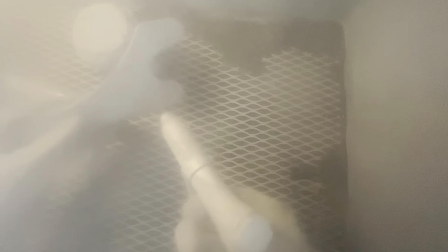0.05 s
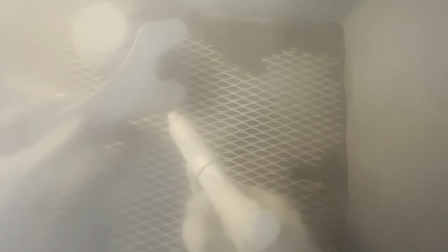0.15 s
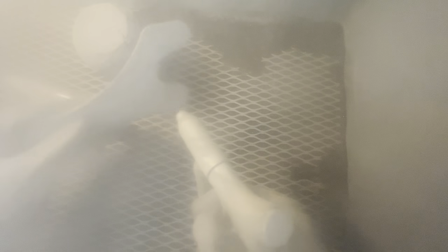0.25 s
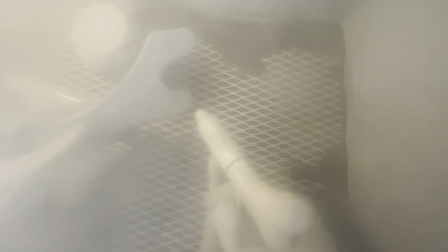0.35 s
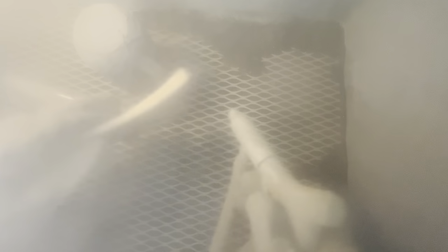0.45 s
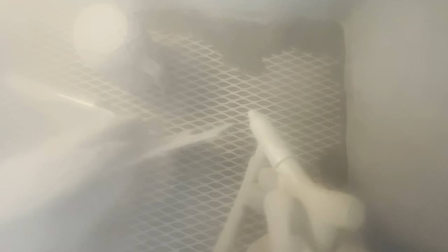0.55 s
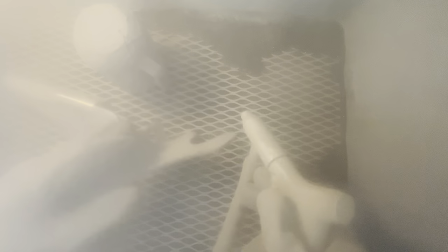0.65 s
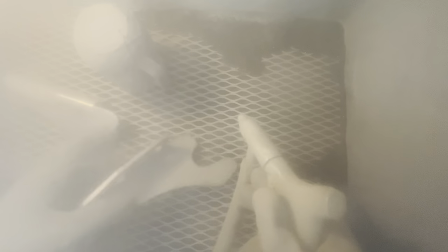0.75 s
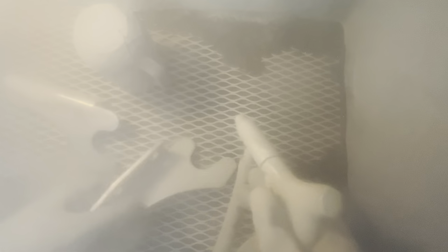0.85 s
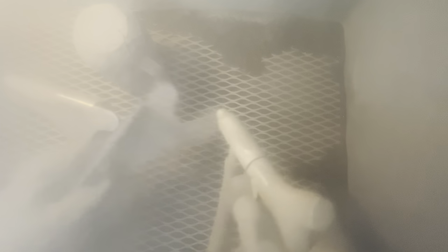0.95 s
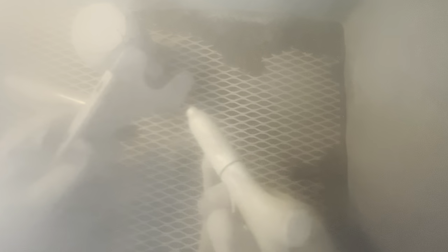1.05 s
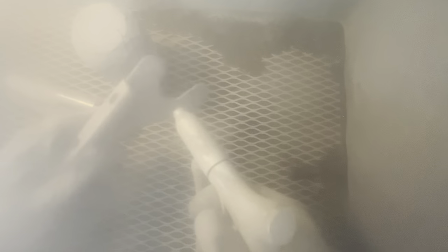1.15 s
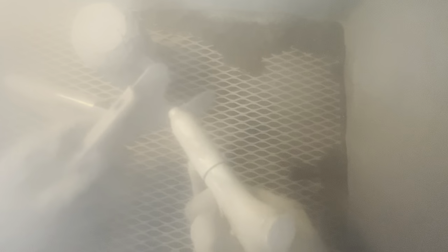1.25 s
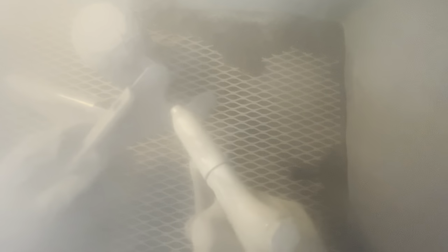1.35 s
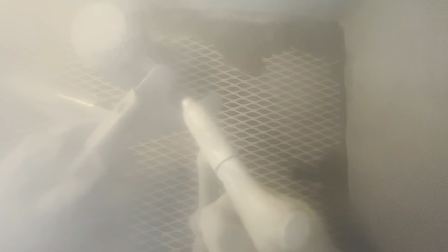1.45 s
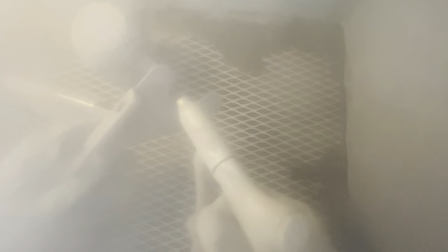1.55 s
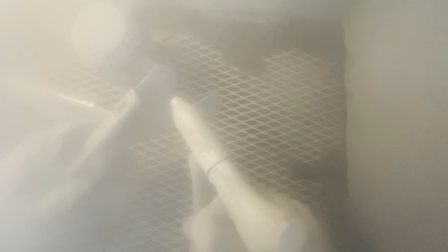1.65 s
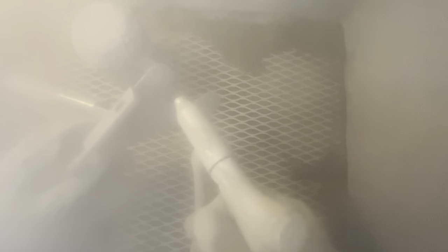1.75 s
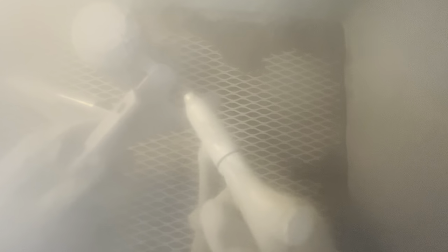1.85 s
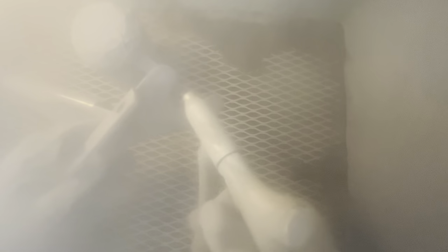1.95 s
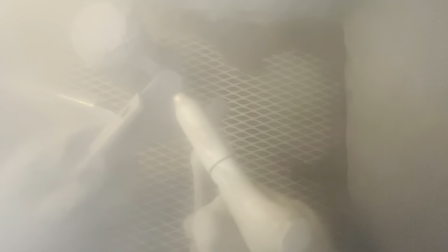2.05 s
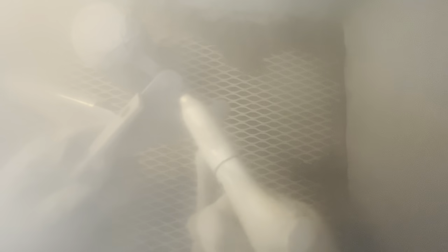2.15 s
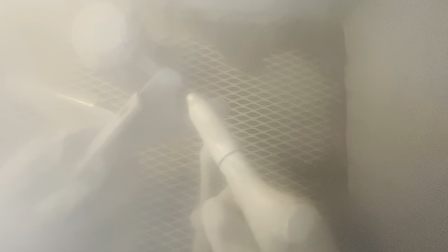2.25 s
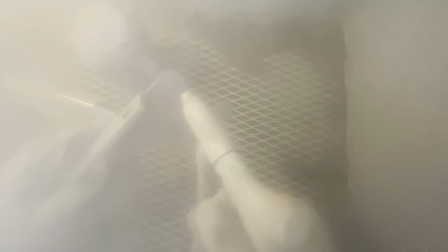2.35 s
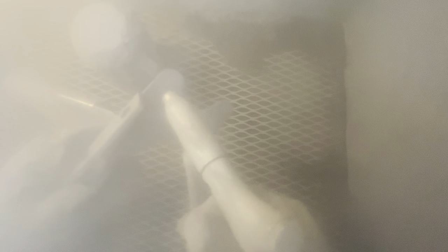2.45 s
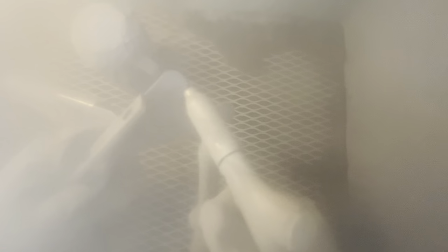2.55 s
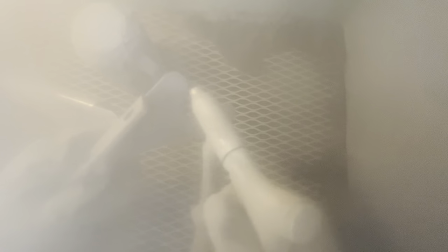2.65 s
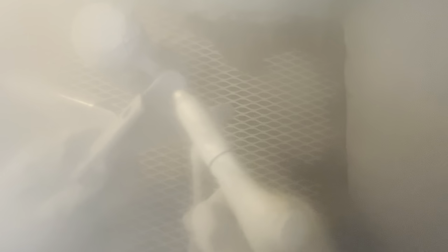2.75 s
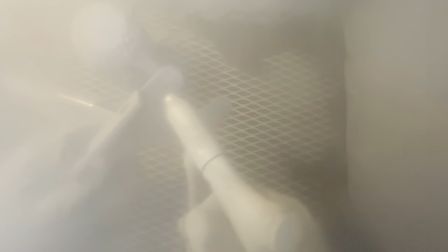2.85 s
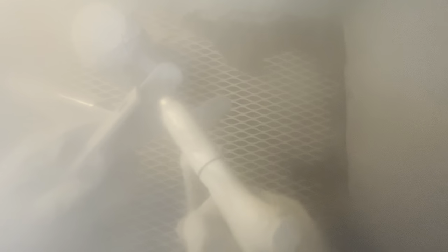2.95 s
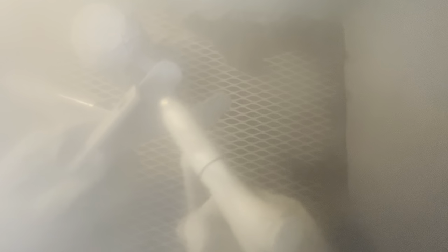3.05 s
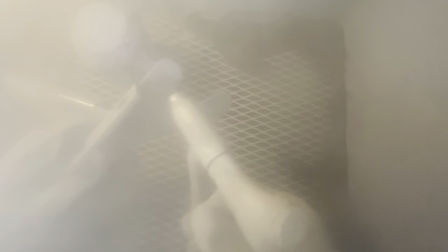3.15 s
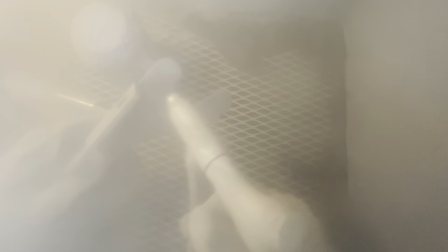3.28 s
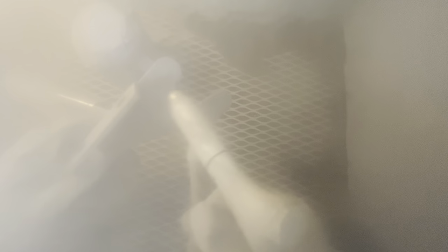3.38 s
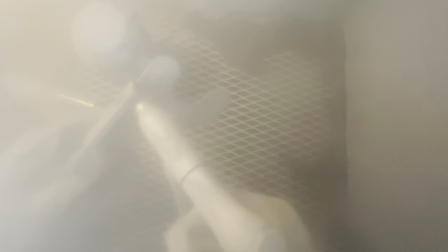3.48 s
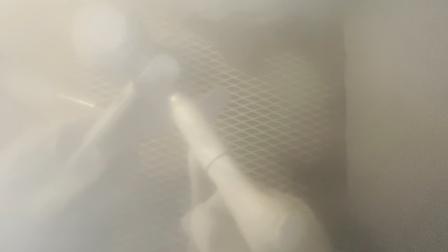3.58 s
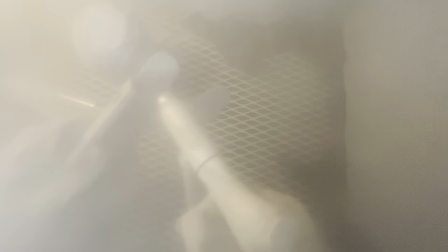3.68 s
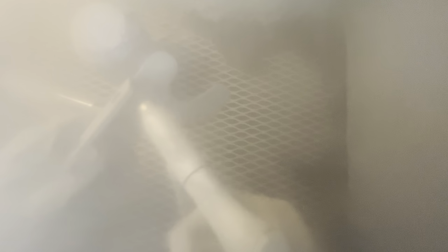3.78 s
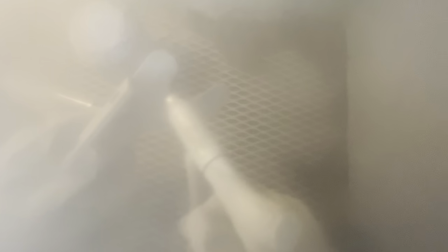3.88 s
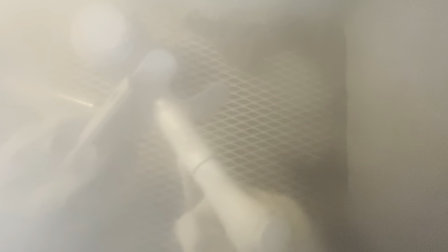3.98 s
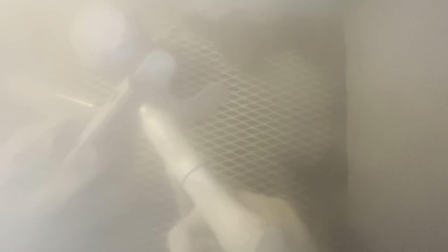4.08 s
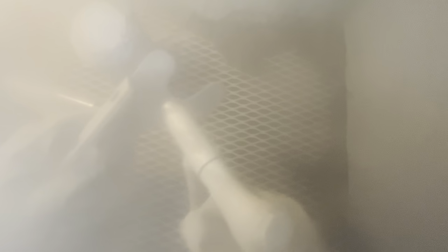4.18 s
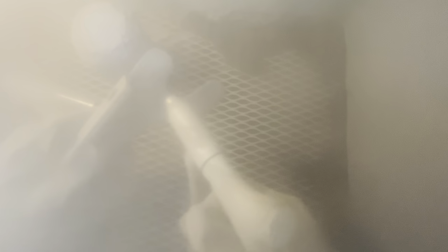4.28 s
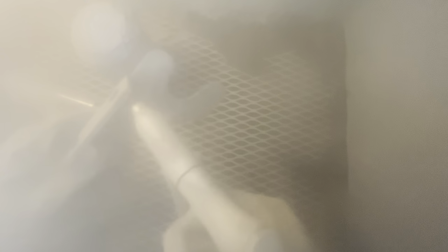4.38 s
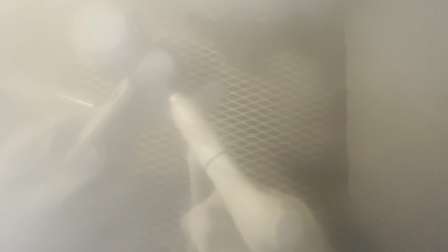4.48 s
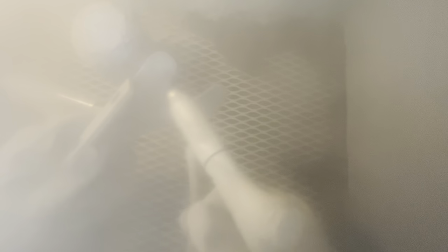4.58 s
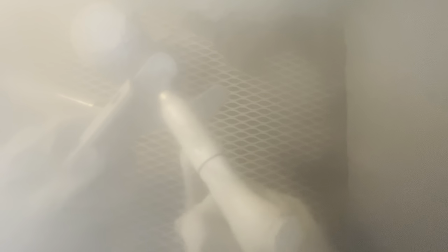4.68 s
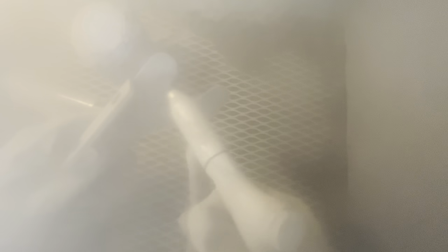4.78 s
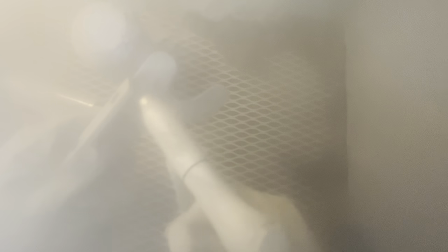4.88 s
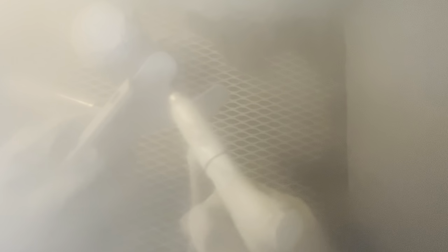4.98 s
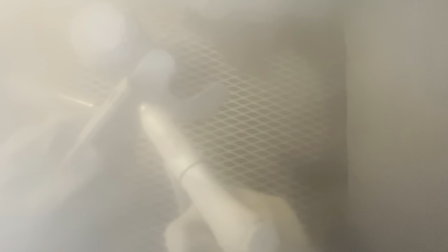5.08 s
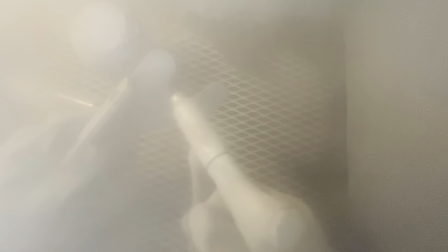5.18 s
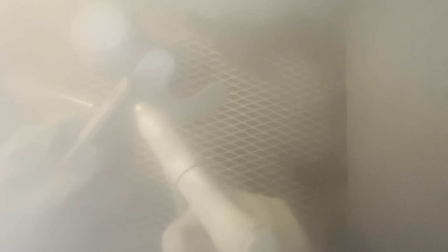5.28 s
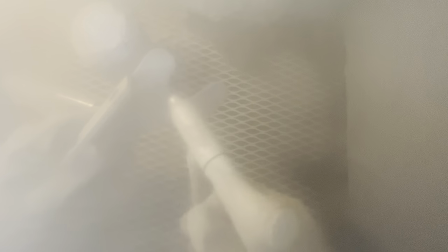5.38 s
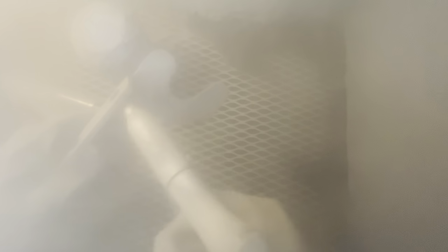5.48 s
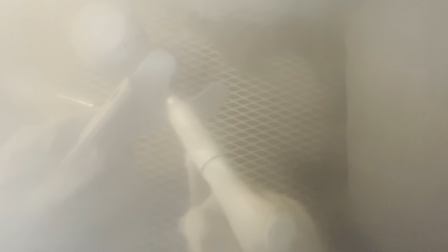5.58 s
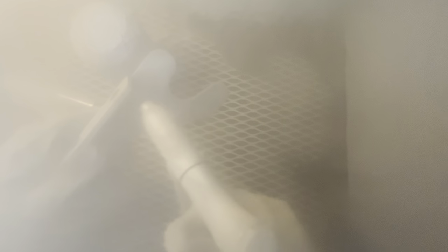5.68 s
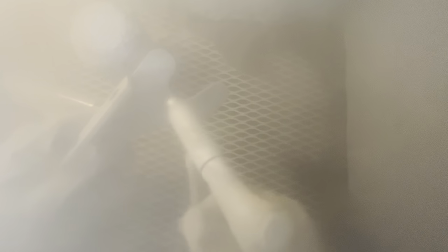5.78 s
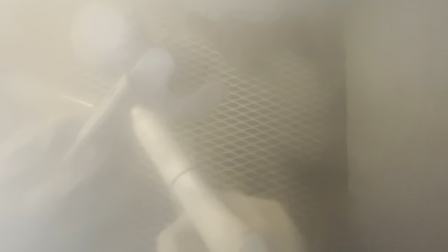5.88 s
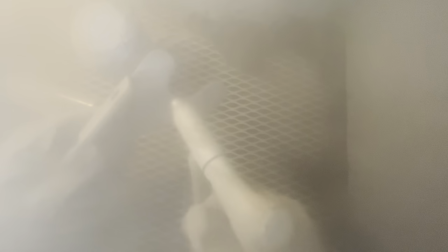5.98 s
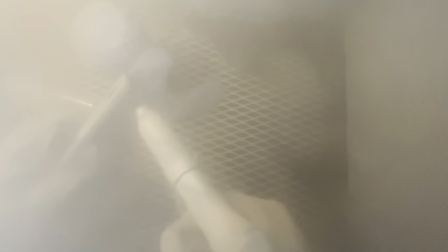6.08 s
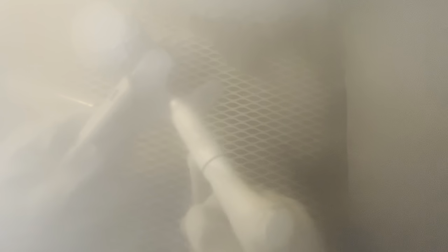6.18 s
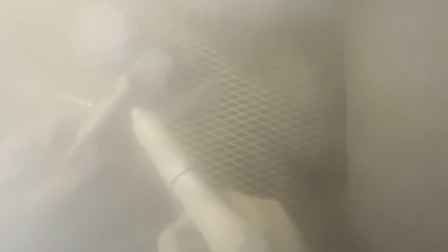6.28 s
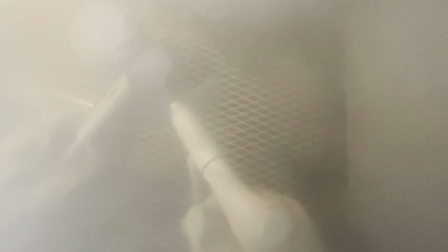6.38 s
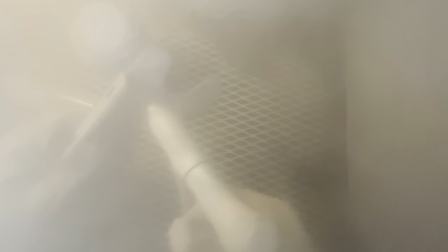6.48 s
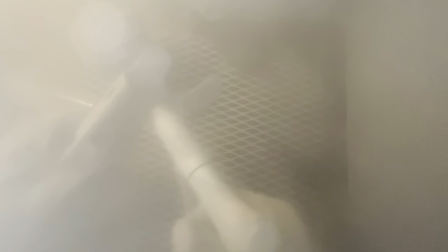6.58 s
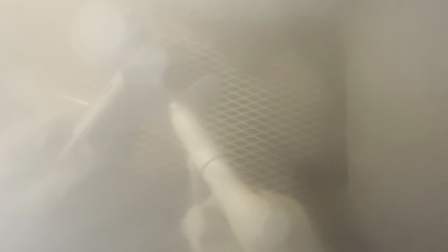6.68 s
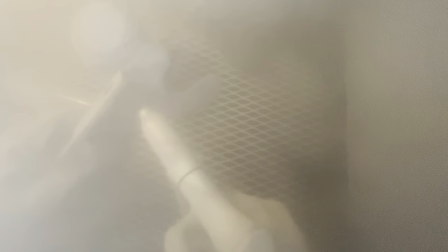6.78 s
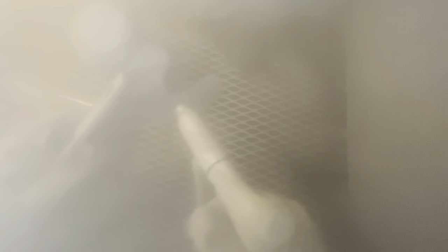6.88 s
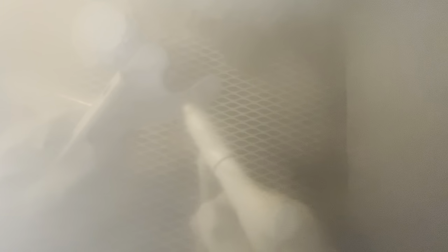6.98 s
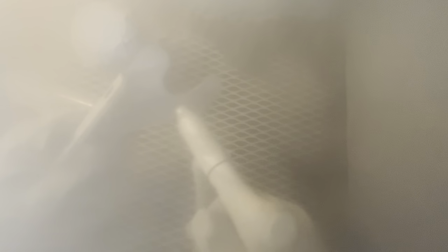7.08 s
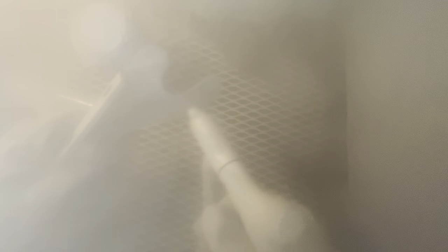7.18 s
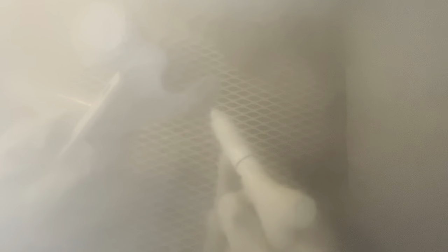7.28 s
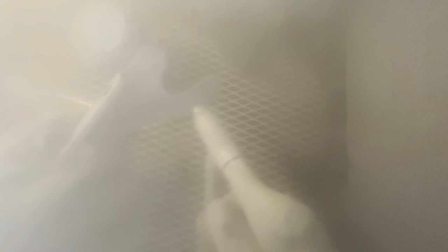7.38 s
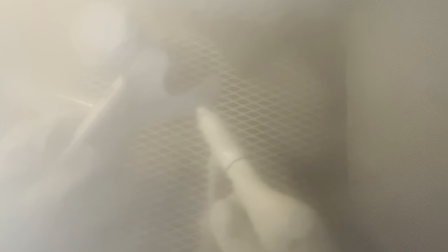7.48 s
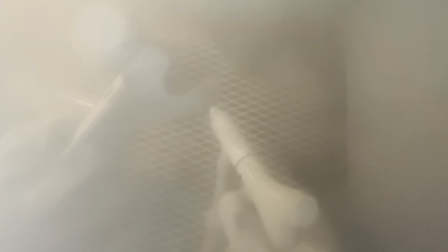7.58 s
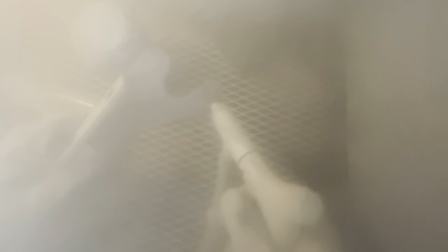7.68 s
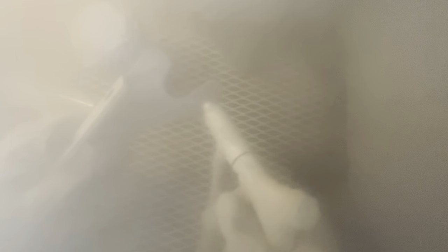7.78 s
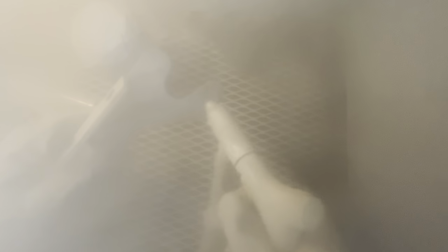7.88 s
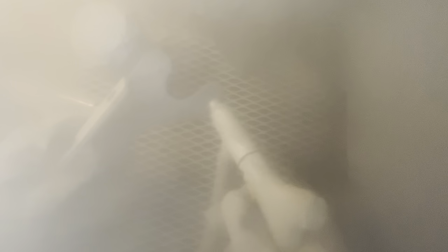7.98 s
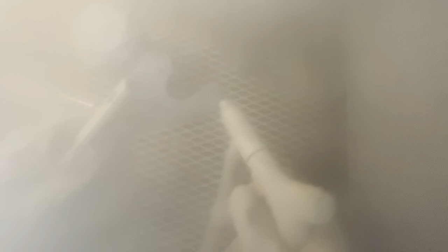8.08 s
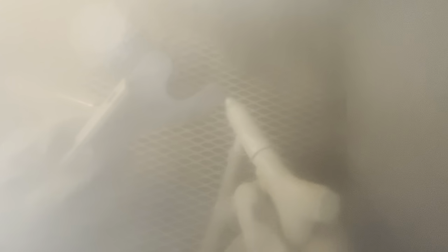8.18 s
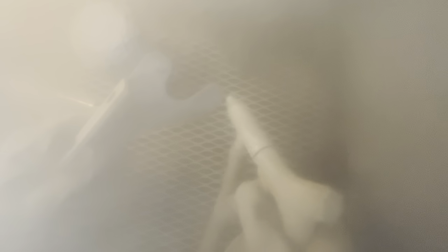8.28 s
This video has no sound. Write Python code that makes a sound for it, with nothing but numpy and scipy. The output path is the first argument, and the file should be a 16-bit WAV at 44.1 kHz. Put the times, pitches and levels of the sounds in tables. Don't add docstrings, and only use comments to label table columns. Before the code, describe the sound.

Low fan air and motor drone, a momentary silence, then fan alone with sharp metal clacks and a small scrape. At just over a second, compressed air and abrasive erupt in a dense bright hiss, with light sheet-metal drumming. It wavers quickly, dips when the jet misses the part, changes ringing colour twice and gradually softens. Close, boxy stereo pickup, short metallic reflections, left side louder.

```python
import sys
import numpy as np
from scipy import signal
from scipy.fft import rfft, irfft
from scipy.io import wavfile
from scipy.ndimage import uniform_filter1d

SR = 44100
rng = np.random.default_rng(int(sys.argv[2]) if len(sys.argv) > 2 else 0)


def rack_gain(trim_db):
    fader = np.asarray(trim_db, float)
    return 10 ** (fader / 20)


def store_wav(level_fs):
    pcm = np.round(np.clip(np.atleast_2d(level_fs), -1, 1) * 32767)
    wavfile.write(sys.argv[1], SR, pcm.T.astype(np.int16))


N = 367794
T = np.arange(N) / SR
HOP = 1536
SIZE = 3 * HOP
HZ = np.arange(SIZE // 2 + 1) * SR / SIZE
STARTS = np.arange(-HOP, N, HOP)
CUT_S, OPEN_S = .5545, 1.268


def walk(rate):
    k = int(SR / rate)
    steps = np.repeat(rng.standard_normal(N // k + 1), k)
    return 0.43 * uniform_filter1d(uniform_filter1d(steps, k), k)[:N]


def drift(shape, keep):
    rows = rng.standard_normal((len(STARTS), *shape))
    keep = min(keep, .995)
    return signal.lfilter([np.sqrt(1 - keep ** 2)], [1, -keep], rows, axis=0, zi=keep * rows[-1:])[0]


def grit(scatter_db):
    weight_db = scatter_db * np.minimum(rng.exponential(size=N), 5)
    x = rng.standard_normal(N) * rack_gain(weight_db)
    return x / x.std()


def moments(x):
    padded = np.pad(x, (HOP, 3 * HOP))
    frames = padded[STARTS[:, None] + HOP + np.arange(2 * HOP)] * np.hanning(2 * HOP)
    return rfft(np.pad(frames, ((0, 0), (HOP // 8, HOP - HOP // 8))))


def box(swing, echo_db):
    t60_s, creep_keep, wave_db = 0.067, 0.98, -3
    alike_hz = 2770
    fall = np.exp(-np.log(1000) * np.arange(HOP * 3 // 4) / SR / t60_s)
    echoes = drift((4, len(fall)), creep_keep) * fall / np.sqrt(np.sum(fall ** 2))
    tails = rfft(echoes, SIZE).transpose(1, 0, 2)
    alike = np.exp(-(HZ / alike_hz) ** 2)
    still = rack_gain(echo_db - 6.2 * alike) * tails[:2]
    rocking = rack_gain(wave_db - 14 * alike) * swing * tails[2:]
    left, own = still + rocking
    return 1 + np.array([left, alike * left + np.sqrt(1 - alike ** 2) * own])


def heard(common, apart, colour, body, alike=1):
    # (pitch [Hz], common share [0-1], lead of the right port [rad])
    ports = [(0, 0.77, -2.5), (298, 0.62, 0), (640, 0.81, 2), (1080, 0.87, 1.2), (1850, 0.93, 1.37),
             (2320, 0.8, 1.5), (4300, 0.73, 1), (5520, 0.9, 1.5), (6200, 0, 6), (8580, 0.54, 7),
             (10400, 0.98, 10), (11540, 0.93, 12), (12700, .8, 12.5), (13400, .95, 16.5), (14300, .9, 17),
             (14800, .7, 17), (15400, .95, 18)]
    hz, *db = np.transpose(colour)
    gain = rack_gain([np.interp(np.log(HZ + 1), np.log(hz), d) for d in db])[:, None] * body
    gain = gain / np.sqrt(np.mean(np.abs(gain) ** 2, axis=(0, 2), keepdims=True) / 2)
    port_hz, share, lead = np.transpose(ports)
    share = np.clip(alike * np.interp(HZ, port_hz, share), 0, 1)
    left = moments(common)
    shifted = np.exp(1j * np.interp(HZ, port_hz, lead)) * left
    right = share * shifted + np.sqrt(1 - share ** 2) * moments(apart)
    frames = irfft(gain * np.array([left, right]), SIZE)
    out = np.zeros((2, N + 5 * HOP))
    for k, start in enumerate(STARTS):
        out[:, start + HOP:start + HOP + SIZE] += frames[:, k]
    return out[:, HOP + HOP // 8:][:, :N]


def extractor(cabinet):
    # (pitch [Hz], left level [dB], right level [dB])
    fan_tone = [(25, -14, -18), (110, 1, -2), (243, -7.5, -15), (650, -3.5, -5.5), (820, 1, -2.5),
                (1150, 1, -2), (1500, -1, -9), (1800, -5, -7.5), (3960, -15.5, -19), (5530, -9.5, -22),
                (7450, -15.5, -23.5), (9400, -23, -20.5), (10700, -25, -25), (12700, -27, -34),
                (15700, -31, -26)]
    # (pitch [Hz], left level [dB], right level [dB])
    motor_tone = [(101, -7, -7), (223, -10.5, -12), (346, 5, 0), (556, -1, -7.5), (770, 0.5, 3.5),
                  (1090, -3, -8), (1550, -3, -7), (1900, -43, -41)]
    fan_db, motor_db = -40.5, -36
    since = np.maximum(T - OPEN_S, 0)
    duck_db = -5.5 * (1 - np.exp(-since / 0.2)) - 9 * (1 - np.exp(-since / 5.2))
    ducked = rack_gain(fan_db + duck_db + .5 * walk(12))
    motor = rack_gain(motor_db + 0.99 * walk(7.5)) * (T < CUT_S)
    fan = heard(ducked * grit(1.0), ducked * grit(.6), fan_tone, cabinet, alike=.45)
    return fan + heard(motor * grit(.7), motor * grit(.7), motor_tone, cabinet)


def knocks():
    # (time [s], rms level [dB], rise [s], t60 [s], pitch [Hz])
    contacts = [(0.57, -42, 0.023, 0.18, 160), (0.7446, -25.5, 0.016, 0.096, 1270),
                (0.744, -45, .006, .05, 4000), (0.745, -27, 0.016, 0.092, 316),
                (.761, -39, .005, 0.075, 330), (.762, -39, .005, .08, 1100),
                (0.772, -37, 0.0036, 0.092, 240), (.80, -42, .01, 0.3, 290),
                (.904, -32.5, 0.015, 0.067, 1240), (0.905, -34, 0.017, 0.095, 300),
                (0.92, -48, .01, 0.3, 110), (1.24, -40.5, .03, 0.23, 430), (4.2, -38, 0.086, 0.4, 1300),
                (4.151, -51, 0.062, 1.0, 360), (0.744, -47, .005, .04, 7400)]
    out = np.zeros((2, N))
    for s, db, rise, t60, hz in contacts:
        span = slice(int((s - .2) * SR), int((s + .6) * SR))
        t = T[span] - s
        shape = np.where(t < 0, np.exp(t / rise * 2), np.exp(-np.log(1000) * t / t60))
        near, far = rng.standard_normal((2, len(t))) * shape
        grate = signal.butter(2, (0.65 * hz, 1.29 * hz), "bandpass", fs=SR, output="sos")
        ring = signal.sosfilt(grate, [1.74 * near, .5 * near + 0.4 * far])
        out[:, span] += rack_gain(db) * np.sqrt(SR / 2 / hz) * ring
    return out


def thumps():
    # (time [s], peak level [dB], pitch [Hz], t60 [s])
    bumps = [
        (.745, -38, 80, 0.17),
        (.739, -26.5, 950, .075),
        (.740, -26.5, 1430, .09),
        (.743, -29, 330, .1),
        (.903, -37, 930, .08),
        (.905, -38, 1400, .08),
        (1.275, -19.5, 109, 0.092),
        (3.29, -45, 74.6, .25),
        (4.202, -46.5, 159.4, 0.56),
        (4.533, -44, 110, 0.26),
    ]
    out = np.zeros(N)
    for s, db, hz, t60 in bumps:
        t = np.maximum(T - s, 0)
        push = 1 - np.exp(-t / 0.0052)
        out += rack_gain(db) * push * np.exp(-np.log(1000) * t / t60) * np.sin(2 * np.pi * hz * t)
    return out * np.array([[1.5], [.9]])


def stroke():
    wave_hz, uneven_rad = 6.3, 1.2
    return np.sin(2 * np.pi * wave_hz * STARTS / SR + uneven_rad * drift((), keep=0.945))[:, None]


def handling():
    # (back on [s], sliding [s], off [s], part ring [dB])
    misses = [
        (1.455, .03, .03, -4.5),
        (1.6, 0.037, 0.027, -4),
        (2.33, .05, .03, -7),
        (2.61, 0.15, 0.036, -6.5),
        (4.02, 0.07, .17, -6),
        (4.16, .04, 0.068, -4),
        (6.09, 0.033, 0.2, -2.5),
        (7.52, 0.064, 0.12, -4.5),
    ]
    # (time [s], walls [dB], part [dB])
    slugs = [(1.49, 2.5, 1.5), (3.35, 1.5, -1.2), (3.64, 1.5, 0), (3.77, 0, 2), (4.25, 0.5, 0.5),
             (4.39, 1.5, -1), (4.9, 0, -2.5), (5.31, 1.5, -1.8), (6.17, 1.5, -1), (6.29, 1.5, -1),
             (6.47, 1, -1.2), (7.6, 0.5, 1.5), (7.92, 0.5, 0)]
    snap_s, slug_s = .04, 0.019
    miss_db = 0
    for s, slide, off, db in misses:
        leaving = (T - s + off + slide) / slide
        returning = (s - T) / snap_s + .5
        miss_db = miss_db + db * np.clip(np.minimum(leaving, returning), 0, 1)
    slug_db = sum(np.outer(db, np.exp(-.5 * ((T - s) / slug_s) ** 2)) for s, *db in slugs)
    return miss_db, *slug_db


def faces(swing, ring_db, wander_db, swing_db, right_share):
    # (pitch [Hz], width [Hz], level [dB])
    face_a = [(1590, 60, -3), (1780, 94, -2), (2040, 65, -3), (2410, 39, -3), (2880, 48, -8),
              (3690, 92, -9), (4810, 79, -2), (5280, 38, -2), (5610, 160, -4), (6260, 150, -2),
              (6550, 31, -4), (7740, 90, -6), (8110, 58, -4), (8580, 180, -5)]
    face_b = [(1770, 110, 0), (2140, 44, -.5), (2420, 38, -5), (2740, 32, -9), (3310, 62, -10),
              (3980, 83, -9), (4800, 53, -3), (4990, 64, -4), (5360, 45, -4), (5640, 170, -2),
              (5970, 36, -5), (6150, 120, -4), (6780, 190, -5), (7360, 65, -3), (8590, 94, -4),
              (7620, 63, -3)]
    face_c = [(1570, 160, -1), (2200, 49, -1), (2480, 44, -5), (3550, 38, -7), (4720, 140, -5),
              (5460, 55, 2.5), (5730, 39, -5), (6120, 57, -2), (6560, 92, -2), (7270, 110, -3),
              (7900, 68, -3), (8750, 110, -4), (9160, 60, -8)]
    # (pitch [Hz], ..)
    hollows = [
        (2550, 3150, 5450, 7470),
        (1930, 2280, 3090, 3440, 4120, 5870),
        (1900, 2750, 3200, 5860, 7600),
    ]
    turn_s, turn_length_s = (2.8, 7.35), 0.3
    hollow_width_hz, hollow_depth, hollow_swing = 140, .7, .29
    first, second = (np.clip(((STARTS + HOP) / SR - s) / turn_length_s + .5, 0, 1) for s in turn_s)
    aims = (1 - first, first - second, second)
    power, hollow = 0, 0
    for face, dips, aim in zip((face_a, face_b, face_c), hollows, aims):
        ring = np.array([rack_gain(db) ** 2 / (1 + (2 * (HZ - hz) / max(width, 45)) ** 2)
                         for hz, width, db in face])
        swell_db = wander_db * drift((len(face),), keep=0.73)
        swell_db = swell_db + swing_db * swing * rng.standard_normal(len(face))
        power = power + (np.clip(aim, 0, 1)[:, None] * rack_gain(ring_db + swell_db) ** 2) @ ring
        left_over = 1
        for hz in dips:
            depth = hollow_depth + hollow_swing * swing * np.cos(hz / 200)
            left_over = left_over * (1 - depth * np.exp(-(2 * (HZ - hz) / hollow_width_hz) ** 2))
        hollow = hollow + aim[:, None] * left_over
    return np.sqrt(hollow * np.array([1 + power, 1 + right_share ** 2 * power]))


def blast(swing):
    # (pitch [Hz], left level [dB], right level [dB])
    sheet_tone = [(20, -32, -36), (60, -21, -27), (116, 1.5, -0.5), (203, 1, -19), (340, 4, 1),
                  (427, 3, -9.5), (670, -7, -7), (876, 2.5, 2), (1410, -20.5, -21)]
    nozzle_tone = [(6000, -27.5, -27), (7700, -3.5, -5), (8680, -5, 4.5), (11000, -7.5, -8),
                   (10770, 0.5, -4.5), (13050, -14, -7), (14600, -15, -21), (14600, -11, -27),
                   (15700, -9, -26), (17000, -44, -46)]
    part_tone = [(620, -29, -33), (916, -27, -23.5), (1375, -8, -12.5), (1710, -5.5, -13.5),
                 (1860, -6, -21), (2150, -5, -15.5), (2690, -12, -18), (3920, -21.5, -31), (4970, -36, -39)]
    walls_tone = [(1800, -45, -42), (2780, -10.5, -20), (3370, -10.5, -13), (4400, -6.5, -15),
                  (4660, -4, -12.5), (5900, -3.5, -18.5), (7560, -4, -10.5), (8330, -5.5, -23),
                  (9150, -12.5, -12), (10600, -33, -29)]
    # (time [s], nearness to the part [dB], left minus right [dB])
    aim = [
        (1.3, 0.5, 9.5),
        (2.15, 2, 9),
        (2.7, 0.4, 8),
        (3.6, 0, 9.5),
        (4.4, -0.5, 9),
        (4.8, 0, 9.3),
        (6.4, 0, 10.5),
        (7.2, 0.5, 9.5),
        (8.3, 0, 9.5),
    ]
    s, *columns = np.transpose(aim)
    near_db, pan_db = (np.interp(T, s, c) for c in columns)
    miss_db, slug_db, slug_part_db = handling()
    since = np.maximum(T - OPEN_S, 0)
    pull_db = -5.5 * (1 - np.exp(-since / 0.26))
    sag_db = -5.5 * (1 - np.exp(-since / 4.05))
    jet_db = -19.5 + pull_db + sag_db
    walls_db = 0.36 * miss_db + slug_db
    part_db = -4 + near_db + miss_db + slug_part_db
    air_db = -5.5 + 0.05 * miss_db - .3 * slug_db
    sheet_db = -21.5 + 0.29 * miss_db + slug_part_db
    opening = np.clip((T - OPEN_S) / 0.0095, 0, 1)
    flow = opening * rack_gain(jet_db + 0.58 * walk(14))
    cabinet = box(swing, echo_db=-5)
    rings = faces(swing, ring_db=6.5, wander_db=1., swing_db=0.5, right_share=0.66)
    sheet = flow * rack_gain(sheet_db)
    out = heard(sheet * grit(1.0), sheet * grit(1.0), sheet_tone, cabinet)
    air = flow * rack_gain(air_db + 1.9 * walk(11))
    out += heard(air * grit(1.5), air * grit(0.83), nozzle_tone, cabinet)
    part = flow * rack_gain(part_db + 0.32 * walk(22))
    out += heard(part * grit(1.43), part * grit(1.2), part_tone, cabinet * rings ** 1.1)
    walls = flow * rack_gain(walls_db)
    out += heard(walls * grit(2.3), walls * grit(3.3), walls_tone, cabinet * rings)
    return out * rack_gain(np.array([1, -1])[:, None] * (pan_db - pan_db.mean()) / 2)


def scene():
    swing = stroke()
    return extractor(box(0 * swing, echo_db=-9)) + knocks() + thumps() + blast(swing)


def without(x, gaps):
    spectrum, hz = rfft(x), np.arange(N // 2 + 1) * SR / N
    return irfft(spectrum * np.prod([(hz < lo) | (hz > hi) for lo, hi in gaps], axis=0), N)


def roll_off(x):
    return signal.sosfilt(signal.butter(12, 15830, fs=SR, output="sos"), x)


def record(dry):
    # (from [Hz], to [Hz])
    mid_gaps = [(13250, 14450), (15830, 22050)]
    side_gaps = [(11750, 12300), (15140, 22050)]
    fade_out_s, fade_in_s = .028, .031
    left, right = dry
    mid = without((left + right) / 2, mid_gaps)
    side = without((left - right) / 2, side_gaps)
    away = np.maximum((CUT_S - T) / fade_out_s, (T - CUT_S) / fade_in_s)
    fade = np.clip(away, 0, 1) ** 1.3
    return roll_off(np.array([mid + side, mid - side]) * fade)


dry = scene()
out = record(dry)
store_wav(out)
```